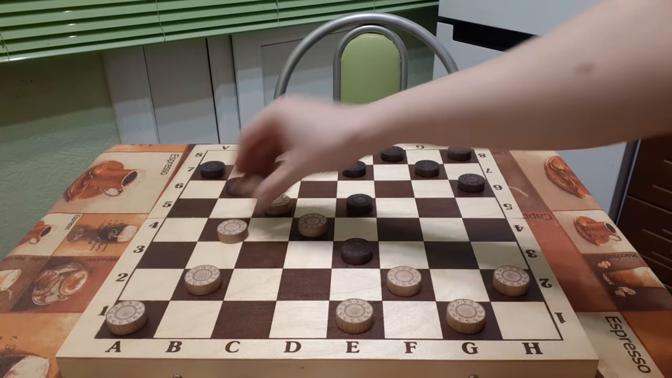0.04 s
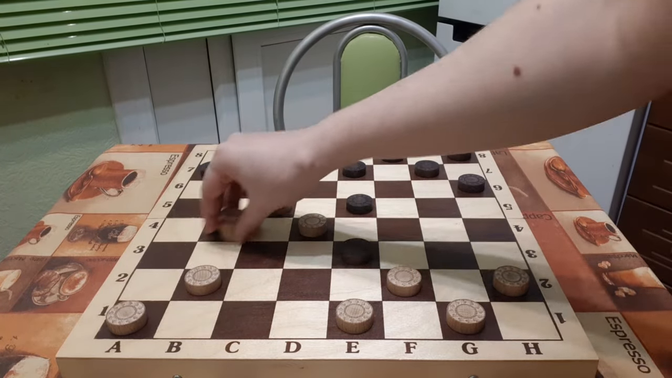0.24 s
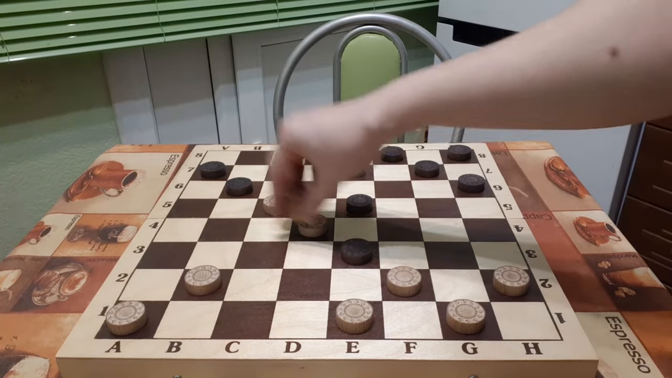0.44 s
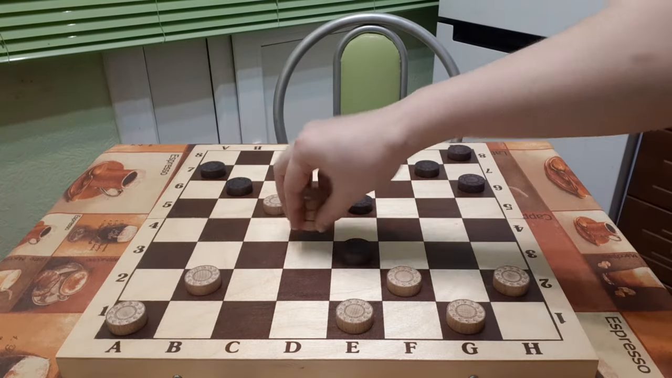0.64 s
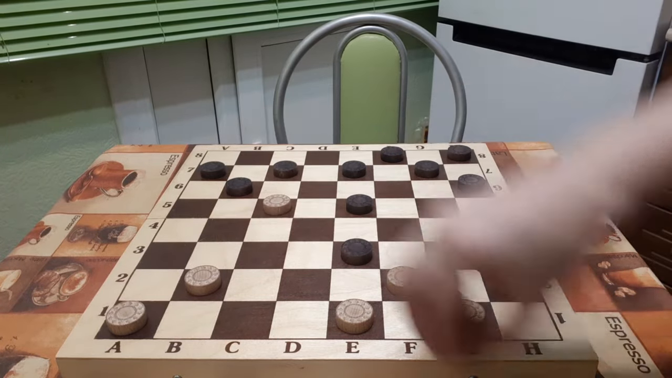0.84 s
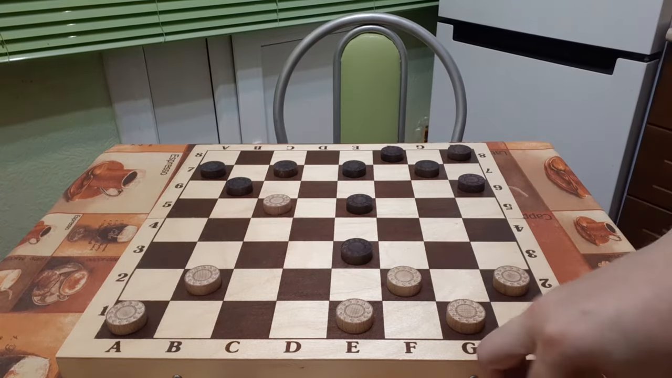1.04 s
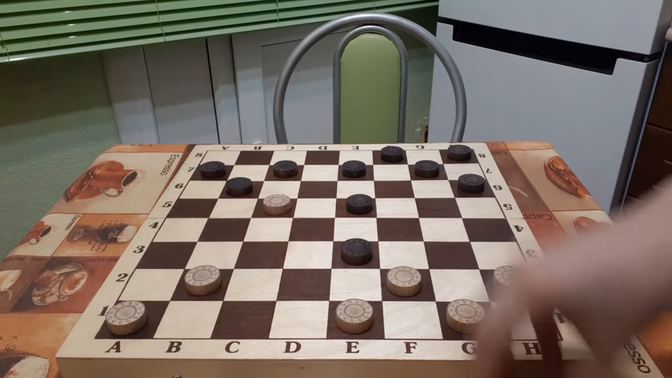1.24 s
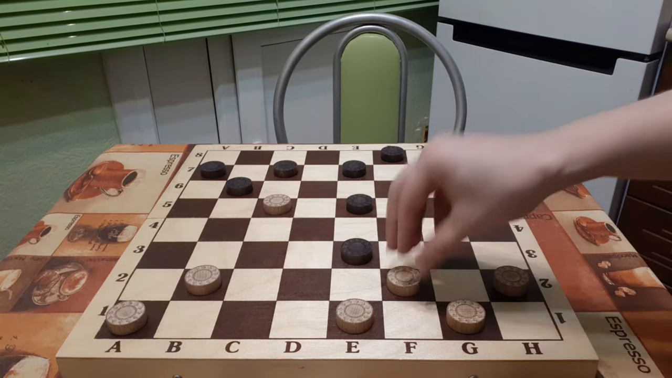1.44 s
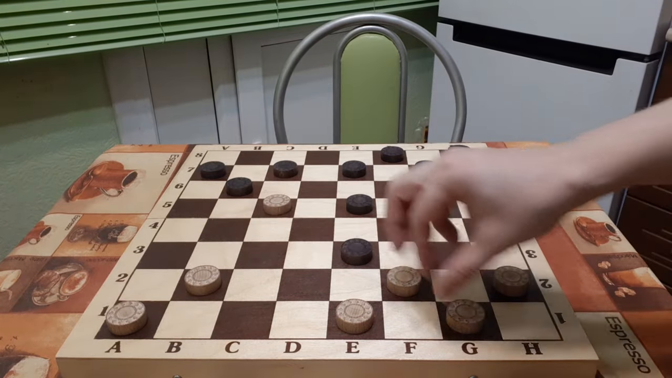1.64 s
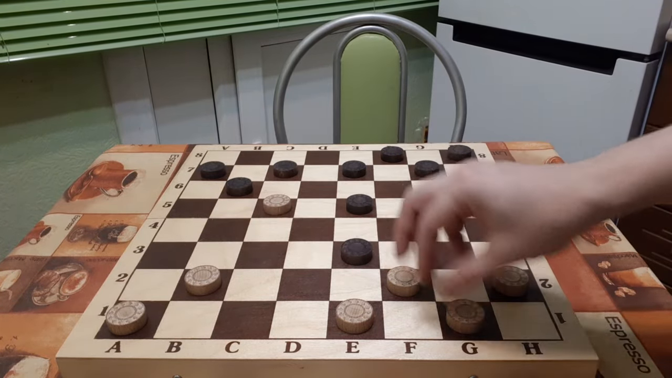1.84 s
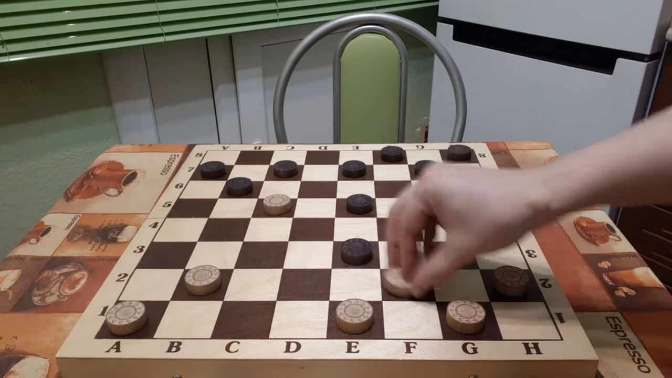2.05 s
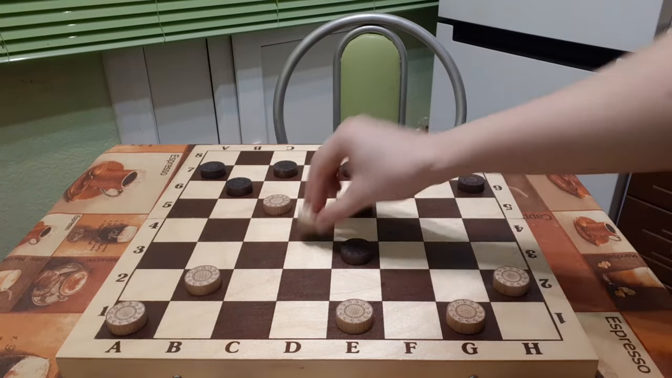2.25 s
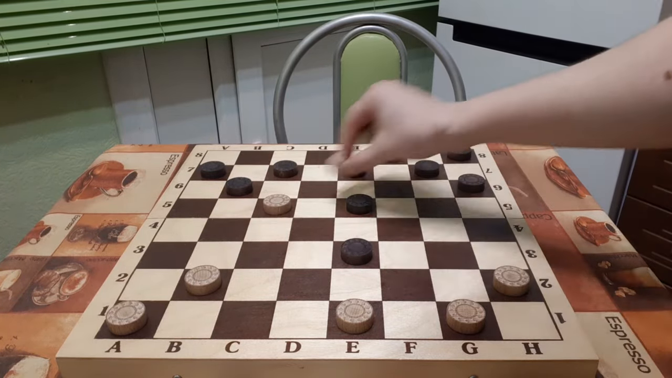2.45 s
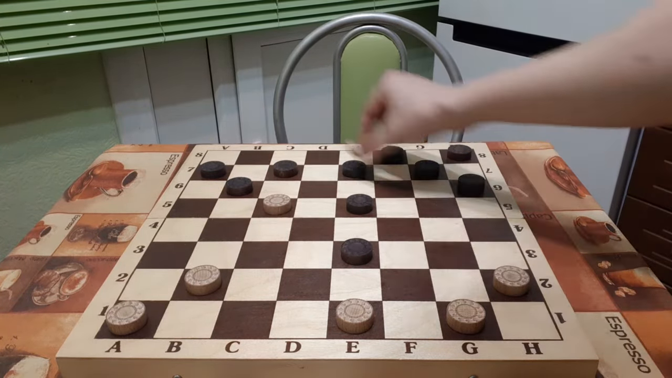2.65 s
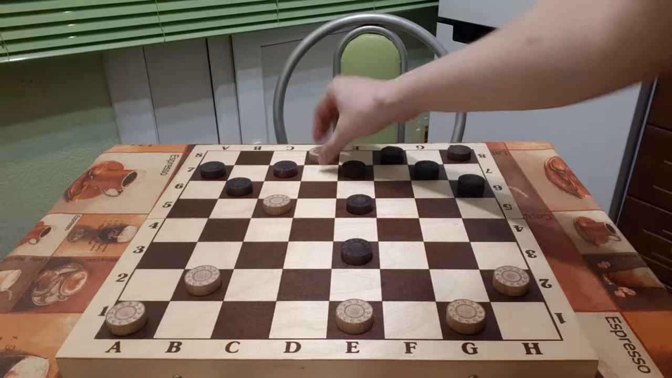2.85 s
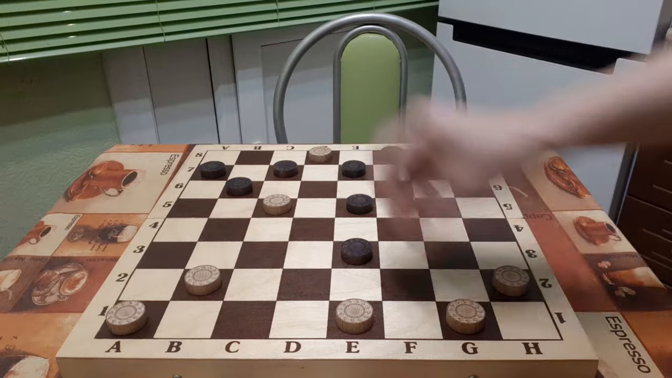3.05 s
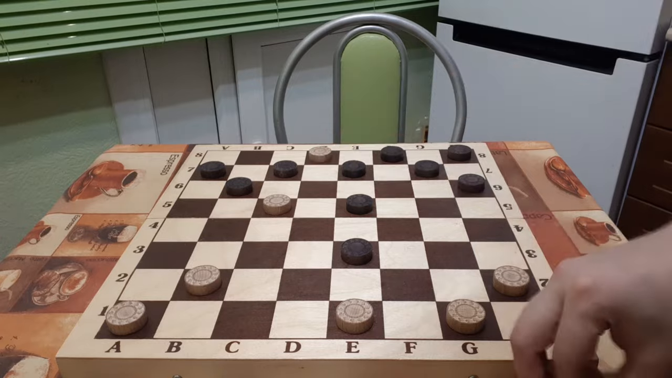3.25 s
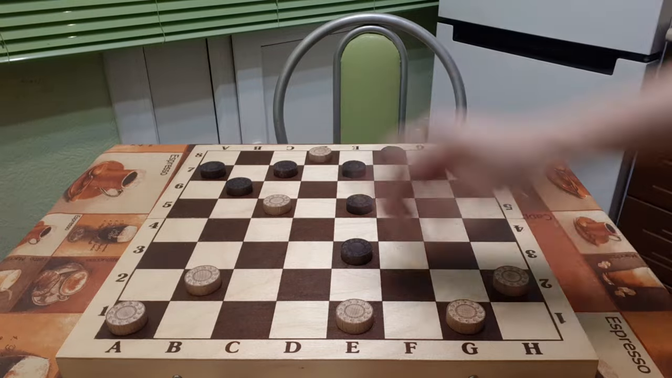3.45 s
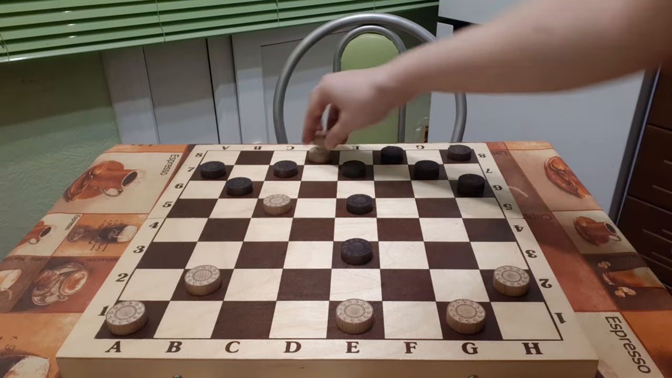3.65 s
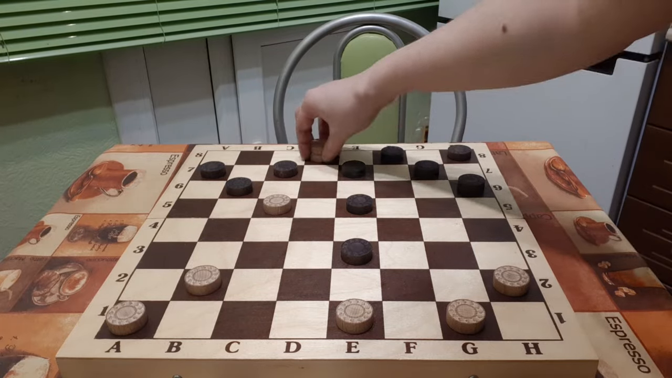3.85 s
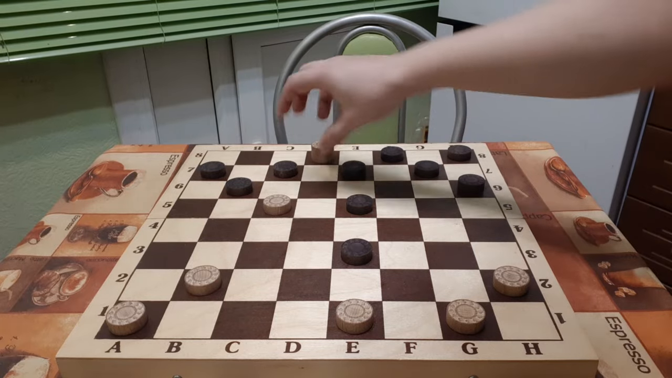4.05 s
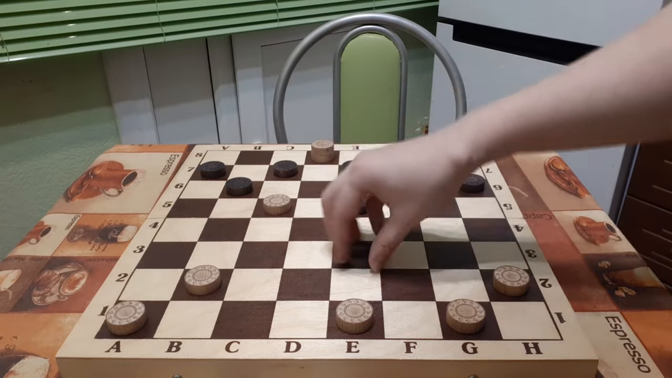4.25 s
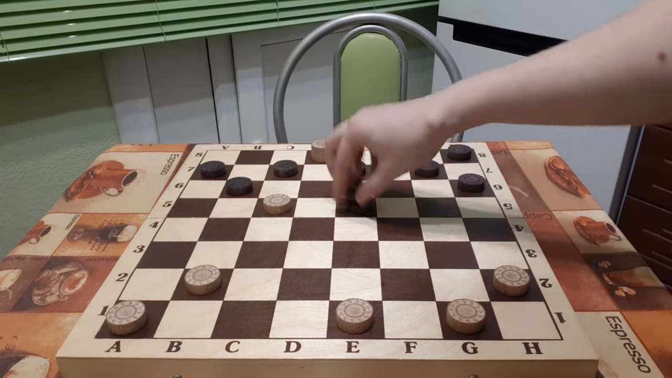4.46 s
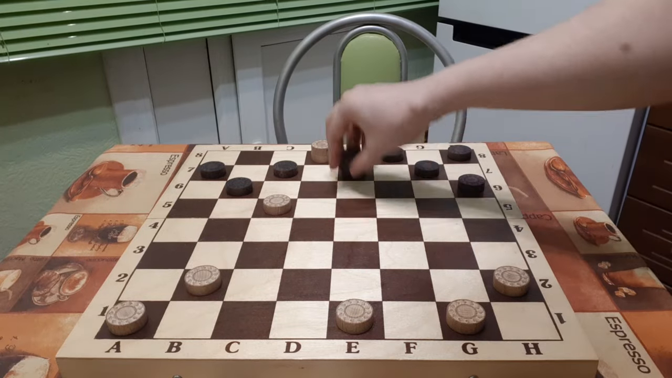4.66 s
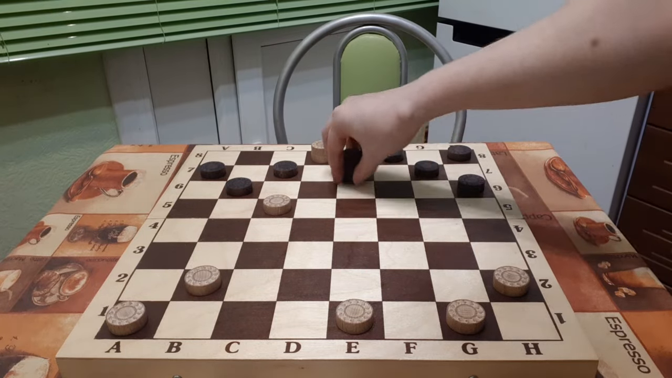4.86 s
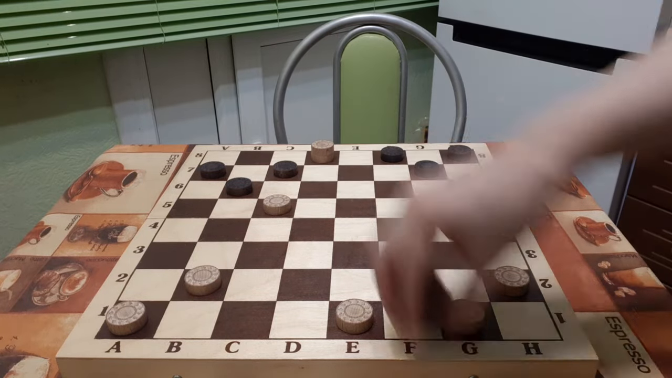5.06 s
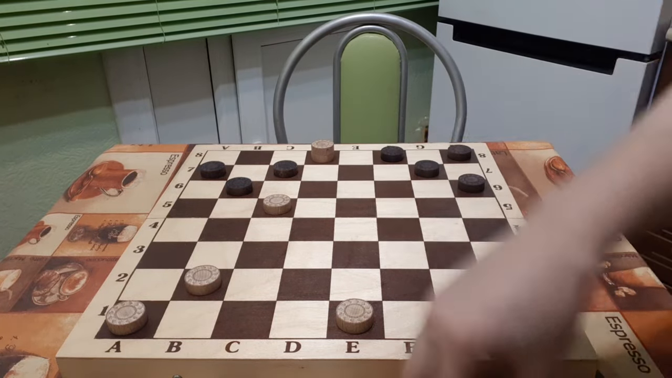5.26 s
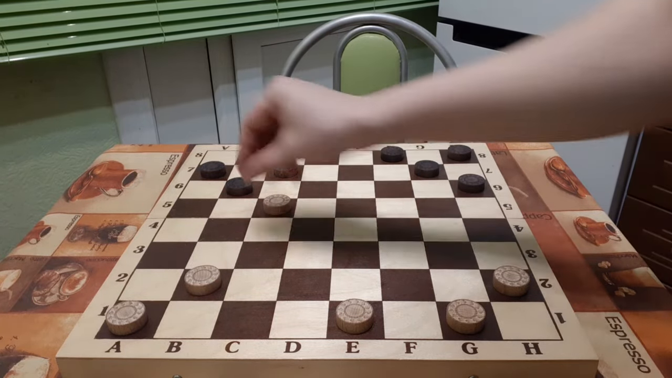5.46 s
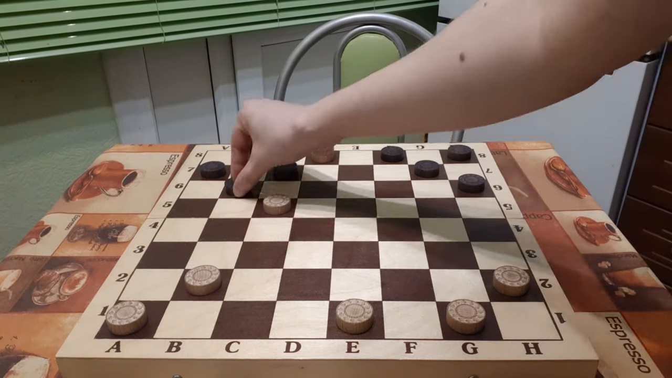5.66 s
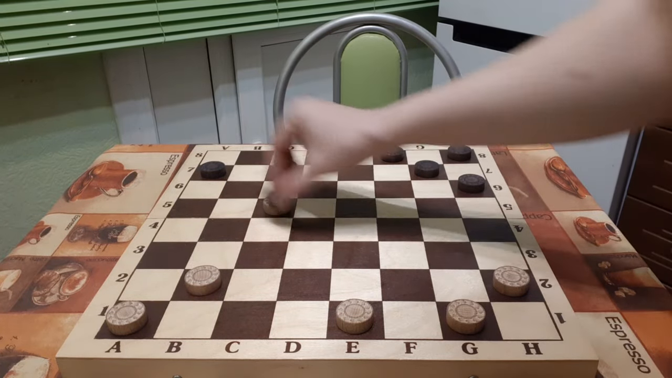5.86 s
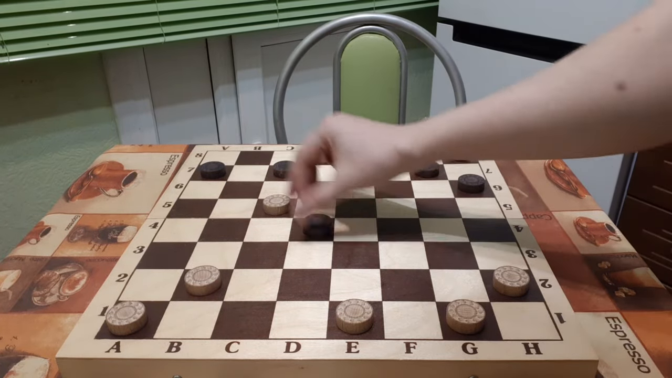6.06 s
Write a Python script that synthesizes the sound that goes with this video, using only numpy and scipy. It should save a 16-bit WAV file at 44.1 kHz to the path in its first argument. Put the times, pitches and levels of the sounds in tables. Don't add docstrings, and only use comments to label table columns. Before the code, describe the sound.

Wooden draughts pieces clack sharply in quick, uneven bursts on a hollow wooden board in a small, hard-walled kitchen, over faint fridge hum.

```python
import sys
import numpy as np
from scipy import signal
from scipy.fft import rfft, irfft
from scipy.io import wavfile

SR = 44100
rng = np.random.default_rng(int(sys.argv[2]) if len(sys.argv) > 2 else 0)


def invert_db(level):
    return 10 ** (np.asarray(level, dtype=float) / 20)


def output_pcm(signal):
    pcm = np.clip(np.atleast_2d(signal).T, -1, 1) * 32767
    wavfile.write(sys.argv[1], SR, np.round(pcm).astype(np.int16))


N = 269010
LEAD = 4410
HZ = np.fft.rfftfreq(N + LEAD, 1 / SR)
LEFT_RIGHT = np.array([[1], [-1]])


# (start [s], room share [dB], knock [dB], rattle [dB], edge treble [dB])
MOVES = [(-.04, -5, -9.5, -2.5, -24.5), (0.171, 0.5, 1.5, -9, -30), (0.479, -1.5, -8.5, -3, -14.5),
         (1.011, .5, -18, -8, -9), (1.071, 1.5, -7, -9, -20), (1.179, -2.5, -5, -7.5, -12.5),
         (2.011, -2, 1.5, -6, -22), (2.29, 1, -10, -3, -13), (2.538, -1, -7.5, -0.5, -9.5),
         (2.804, -4.5, -6, -1.5, -12), (3.22, 3, -5, -11.5, -30.5), (3.73, 1.5, -2.5, -8.5, -37.5),
         (3.919, 4, -4, 2, -24), (4.269, 1.5, -3.5, -3.5, -18), (4.493, 0, -10, 1.5, -11.5),
         (4.75, 0.5, -9.5, -6, -20), (5.241, -2.5, -17, -10, -18), (5.259, -6.5, -17.5, -9, 1.5),
         (5.635, 6.5, -3.5, -8.5, -27), (5.973, -3.5, -10, -2, -14.5)]
# (start [s], end [s])
ASIDE_SPANS = [(1.0, 1.3), (3.2, 3.4)]


def pieces():
    pan_scatter_db, aside_db, late_wet_db = 2.5, 6.5, -1.6
    port_delay_s = 8e-5
    near, far = np.zeros((2, N + LEAD)), np.zeros(N + LEAD)
    moves = np.array(MOVES)
    for s, db, hz in contacts():
        start, wet_db, *layers_db, treble_db = moves[np.searchsorted(moves[:, 0], s) - 1]
        late = np.clip((s - start - .012) / 0.018, 0, 1)
        db -= 4.0 * late
        db -= gain_db(s)
        mix = invert_db(np.array([0, *layers_db, 0]))
        noise = rng.standard_normal((2, 3, 512))
        aside = any(a < s < b for a, b in ASIDE_SPANS)
        pan_db = pan_scatter_db * noise[1, 0, 0] + aside_db * aside
        left, spread = clack(hz, treble_db, noise[0] + .6 * noise[1])
        right, _ = clack(hz, treble_db, noise[0] - .6 * noise[1])
        peak = max(1, invert_db(treble_db))
        left, right = (mix @ v / abs(mix @ v).max() * peak for v in (left, right))
        add(near[0], s, invert_db(db + pan_db / 2) * left)
        add(near[1], s + port_delay_s, invert_db(db - pan_db / 2) * right)
        polarity = np.sign(noise[0, 0, 0])
        add(far, s, invert_db(db + wet_db + late_wet_db * late) * polarity * mix @ spread)
    return near, far


def clack(hz, treble_db, noise):
    contact_s = .0002
    size = noise.shape[-1]
    t = np.arange(size) / SR
    piece = ring(hz, .0045, size) + invert_db(-8) * ring(1.4 * hz, .003, size)
    knock = unit(band(noise[0], 1700, 0.45)) * np.exp(-t / 0.001)
    rattle = unit(band(noise[1], 4800, .6)) * np.exp(-t / .0007)
    sing = np.clip((treble_db + 10) / 14, 0, 1.5) * ring(15300, .005, size)
    edge = unit(band(noise[2], 12500, .3)) * np.exp(-t / .0004)
    near = np.array([piece, invert_db(-10) * knock, invert_db(2.5) * rattle, invert_db(treble_db) * (edge + 1.8 * sing)])
    near = near * (1 - np.exp(-(t / contact_s) ** 2))
    far = [invert_db(-8.5) * tick(hz, 0.28),
           invert_db(3.5) * tick(1600, 0.82),
           invert_db(6) * tick(5010, 0.62),
           invert_db(treble_db + 3.0) * tick(13000, 0.22)]
    return near, np.array(far)


# (touch [s], slap delay [ms], touch level [dB], slap level [dB], piece ring [Hz])
LANDINGS = [(0.2264, 3.8, -31, -29, 3700), (0.4874, 9.6, -24, -10, 4900), (0.5043, 6.5, -13, -19, 6500),
            (1.0174, 12.8, -41, -40, 5000), (1.0784, 3, -35, -50, 4800), (1.1852, 5.1, -34, -31, 4700),
            (2.0232, 4.6, -28, -28, 5500), (2.2984, 3.1, -4, -6.5, 4300), (2.546, 2.1, -16, -6, 3800),
            (2.5582, 5.7, -7, -3, 5200), (2.8111, 4, -8, -6, 4100), (3.2583, 9.2, -55, -39, 4200),
            (3.7389, 2.6, -29, -26, 3600), (3.7504, 11.2, -27, -27, 3650), (3.9762, 3, -44, -58, 3100),
            (4.3055, 18, -40, -36, 2700), (4.5032, 4.7, -20, -9, 4600), (4.7576, 4.5, -8, -9, 5000),
            (4.7771, 8, -12, -13, 5100), (5.2496, 3.1, -14, -21, 6500), (5.2632, 4.4, -15, -11.5, 6200),
            (5.6459, 3, -37, -50, 5000), (5.9824, 2.9, -10, -4, 4950), (5.9922, 16, -5, -13, 5400)]
# (delay [ms], level under the slap [dB])
ROCKS = [(3.2, -5), (11, -8)]
# (time [s], peak level [dB], ring [Hz])
REBOUNDS = [
    (-.03, -34, 4540),
    (2.0163, -45, 1505),
    (5.6392, -42, 1460),
    (5.2655, -9, 6800),
    (0.4889, -28, 3100),
]
# (start [s], end [s], level [dB], ring [Hz])
SCRAPES = [
    (2.299, 2.306, -19, 4400),
    (4.272, 4.33, -46.5, 3500),
    (4.5, 5.9, -72, 2700),
    (2.55, 2.585, -22, 3900),
    (0.08, 0.49, -65.5, 2000),
    (3.74, 3.775, -44, 4400),
    (4.502, 4.508, -23, 6800),
           (3.935, 3.985, -57, 4500)]


def contacts():
    ring_scatter = .13
    rows = list(REBOUNDS)
    for s, slap_ms, touch_db, slap_db, hz in LANDINGS:
        steps = [(0, touch_db), (slap_ms, slap_db)]
        steps += [(slap_ms + ms, slap_db + db) for ms, db in ROCKS]
        after_touch = np.arange(len(steps)) > 0
        rings = hz * (1 + ring_scatter * rng.standard_normal(len(steps)) * after_touch)
        rows += [(s + ms / 1000, db, f) for (ms, db), f in zip(steps, rings)]
    for s0, s1, db, hz in SCRAPES:
        for a, b, c in rng.random((60, 3)):
            rows.append((s0 + (s1 - s0) * a, db - 10 * b - 8 * (1 - a), hz * (0.45 + c)))
    return rows


# (time [s], force [dB], hollow middle [dB], near the frame [dB], hardness [dB])
THUDS = [(0.178, -54, -7, -5, -12), (0.214, -39.5, -10, -10, -12), (0.491, -37, 1, -12, 0),
         (0.514, -26, -8, -13, -12), (0.544, -36, -10.5, -13, -0.5), (1.019, -54, 4, -5, -7),
         (2.013, -24.5, -12.5, -9, -24), (2.022, -39.5, 17, -5, 1), (2.037, -32, -0.5, -4, -14),
         (2.3, -21.5, 2.5, -11, -6), (2.55, -25.5, 12, 0, 7), (2.563, -41, 15, 10, 7.5),
         (2.811, -35, 6, -1, -4), (3.265, -51.5, -1, -10, -11), (3.752, -36, -8, -7, 1),
         (3.969, -52, -1.5, -4, -20), (4.306, -34.5, -4.5, -12, -7), (4.503, -28, -17, 2, -22),
         (4.524, -30.5, 2, -5, 3), (4.757, -34, 12, 5, 3), (4.779, -21.5, -14.5, -5, -24),
         (5.238, -54.5, 8, -18, -12), (5.641, -28, -8, -10, -8), (5.982, -29.5, -12, -12, -26)]
# (frequency [Hz], level [dB], t60 [s])
BOARD = [
    [(197, -.5, .2)],
    [(137.6, 5, 0.2), (62, 1, 0.27)],
    [(253.2, 2, 0.09), (279.2, 4.5, 0.115), (325, 3.5, 0.075)],
    [(385, 3.5, 0.085), (464, 2.5, .07), (519.4, 0, 0.1), (605.2, 1, 0.11), (660, -3, 0.09), (776, 0, 0.09)],
    [(960, -1.5, 0.01), (1047, -0.5, 0.029), (1160, 2, 0.016), (1390, 0, .06)],
]
# (level [dB], middle share [1], frame share [1], hardness share [1])
ANSWERS = [
    (0, 1, 0, 0),
    (-9.5, .6, 0, 0.019),
    (0.5, 0.036, 0, 0),
    (0, 0, 0.94, 0),
    (0, 0, 0, 1),
]


def board():
    size = 20000
    t = np.arange(size) / SR
    out = np.zeros(N + LEAD)
    for s, force_db, *place_db in THUDS:
        levels_db = [force_db + db + np.dot(shares, place_db) for db, *shares in ANSWERS]
        modes = [(level + db, hz, t60) for level, group in zip(levels_db, BOARD) for hz, db, t60 in group]
        chance = rng.standard_normal((15, 2))
        for (db, hz, t60), (a, b) in zip(modes, chance):
            sound = ring(hz * (1 + 0.022 * b), t60, size)
            sound *= 1 - np.exp(-t * hz * 0.76)
            add(out, s, invert_db(db - gain_db(s) + 1.8 * a) * sound)
    return signal.sosfilt(signal.butter(2, 120, "high", fs=SR, output="sos"), out)


# (time [s], ring [Hz], level [dB], t60 [s])
NEIGHBOURS = [(.497, 4540, -32, 0.031), (.504, 3490, -36, 0.015), (1.019, 4500, -56, 0.011),
              (1.19, 4370, -57, 0.0087), (2.299, 4840, -18.5, 0.02), (2.302, 3673, -20, 0.023),
              (2.302, 6520, -21.5, 0.024), (2.553, 6255, -21, 0.034), (2.549, 2110, -23, 0.087),
              (2.564, 3575, -24.5, 0.022), (2.815, 3046, -19.5, 0.034), (2.815, 4253, -23, 0.034),
              (2.815, 6180, -24, 0.039), (3.742, 3550, -39, 0.028), (4.508, 5380, -21.5, .03),
              (4.511, 3880, -32, 0.017), (4.762, 4940, -33, .03), (4.767, 6600, -28, 0.02),
              (5.264, 5020, -25, 0.008), (5.266, 6280, -21, 0.015), (5.986, 3056, -25, .02),
              (5.986, 4270, -27, 0.036)]


def neighbours():
    out = np.zeros(N + LEAD)
    for s, hz, db, t60 in NEIGHBOURS:
        add(out, s, invert_db(db - gain_db(s)) * ring(hz, t60, size=4000))
    return out


# (centre [Hz], level [dB], t60 [s])
ROOM = [(125, -45, 0.15), (250, -36.5, 0.69), (506, -22.5, .35), (976, -24.5, 0.33), (1940, -31.5, 0.32),
        (3260, -28, 0.29), (5150, -30.5, 0.25), (7340, -29.5, 0.27), (10326, -34, 0.18),
        (15700, -25.5, 0.19)]


def room(x):
    size, build_s = 26000, .0035
    out = np.zeros((2, len(x)))
    t = np.arange(size) / SR
    mid, side = rng.standard_normal((2, 2 * size))
    bands = [band(mid + np.clip(hz / 900, 0, 1) * side * LEFT_RIGHT, hz, 0.43) for hz, _, _ in ROOM]
    build = 1 - np.exp(-(t / build_s) ** 2)
    fades = [invert_db(db) * np.exp(-np.log(1000) * t / t60) * build for _, db, t60 in ROOM]
    starts = [move[0] for move in MOVES] + [N / SR]
    places = rng.integers(0, size, len(MOVES))
    for s0, s1, place in zip(starts, starts[1:], places):
        response = sum(pair[:, place:place + size] * fade for pair, fade in zip(bands, fades))
        sent = x[None, int(s0 * SR) + LEAD:int(s1 * SR) + LEAD]
        add(out, s0, signal.fftconvolve(sent, response, axes=1))
    return out


HUM_HZ = [100, 158.3, 200.5, 247.5, 298, 316.6, 397.4, 500, 542.7, 691.4, 799.6]
# (level [dB rms], width [Hz])
HUM = [(-70, 1.2), (-66, 2.2), (-75, 4), (-74.5, 6), (-70.5, 4.3), (-72.5, 4), (-82, 4), (-86.5, 3),
       (-89, 3), (-85, 3), (-91.5, 3)]


def refrigerator():
    size = N + LEAD
    t = np.arange(size) / SR
    out = np.zeros((2, size))
    for hz, (db, width_hz) in zip(HUM_HZ, HUM):
        resonance = 1 + ((HZ - hz) / width_hz) ** 2
        waver = unit(irfft(rfft(rng.standard_normal(size)) / resonance, size))
        steady = np.sqrt(2) * np.sin(2 * np.pi * hz * t)
        out += invert_db(db) * (.9 * steady + .4 * waver) * invert_db(1.5 * LEFT_RIGHT)
    return out


# (frequency [Hz], density [dB per Hz])
AIR = [(15, -49), (25, -23.5), (48, -12), (79, -12), (162, 1), (238, -8.5), (306, -2), (468, -14),
       (612, -22), (687, -17.5), (1030, -25.5), (2500, -37), (3250, -68), (5500, -120)]
# (frequency [Hz], density [dB per Hz])
HISS = [(600, -11.5), (1500, -3.5), (4000, -1), (7000, -3), (11000, -1.5), (15500, -1.5)]


def background():
    air = noise_of(AIR, -66.5)
    hiss = noise_of(HISS, -78.5)
    return air + hiss + refrigerator()


def noise_of(points, db):
    top_hz = 15900
    hz, colour_db = np.transpose(points)
    colour = invert_db(np.interp(np.log(HZ + 1), np.log(hz), colour_db)) * (HZ < top_hz)
    mid, side = rfft(rng.standard_normal((2, N + LEAD))) * colour
    wide = np.clip(HZ / 1200, .25, 1)
    return invert_db(db) * unit(irfft(mid + wide * side * LEFT_RIGHT, N + LEAD))


# (time [s], level [dB])
GAIN = [(0, -3), (.45, -3.5), (.8, 0.5), (2.0, -0.5), (2.6, -4.5), (3.0, -7.5), (3.75, -7.5), (3.95, -2.5),
        (4.3, -2), (4.9, 2.5), (5.4, 0), (5.9, -1.5), (6.1, -6.5)]


def gain_db(s):
    return np.interp(s, *np.transpose(GAIN))


def band(x, hz, octaves):
    f = np.maximum(np.fft.rfftfreq(x.shape[-1], 1 / SR), 1)
    bell = np.exp(-.5 * (np.log2(f / hz) / octaves) ** 2)
    return irfft(rfft(x) * bell, x.shape[-1])


def unit(x):
    return x / np.sqrt(np.mean(x ** 2))


def ring(hz, t60, size):
    t = np.arange(size) / SR
    return np.sin(2 * np.pi * hz * t) * np.exp(-np.log(1000) * t / t60)


def tick(hz, octaves, size=512):
    click = band(np.arange(size) == 22., hz, octaves)
    return click / abs(click).max()


def add(track, s, sound):
    i = int(s * SR) + LEAD
    n = min(sound.shape[-1], track.shape[-1] - i)
    track[..., i:i + n] += sound[..., :n]


def scene():
    direct_db = 6.5
    near, far = pieces()
    thuds = board()
    echoes = room(far + neighbours() + invert_db(-12) * thuds)
    hits = invert_db(direct_db) * near + thuds * invert_db(.7 * LEFT_RIGHT) + echoes
    deep_cut = signal.butter(2, 90, "high", fs=SR, output="sos")
    heard = (signal.sosfilt(deep_cut, hits) + background())[:, LEAD:]
    return heard * invert_db(gain_db(np.arange(N) / SR))


def band_limit(x):
    return signal.sosfilt(signal.butter(12, 17130, fs=SR, output="sos"), x)


def record(dry):
    top = signal.ellip(6, .5, 50, 16100, fs=SR, output="sos")
    dull = signal.sosfilt(top, dry)
    rounded = dull / (1 + np.abs(dull / .93) ** 6) ** (1 / 6)
    return band_limit(rounded)


dry = scene()
out = record(dry)
output_pcm(out)
```